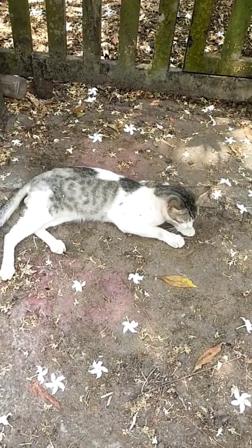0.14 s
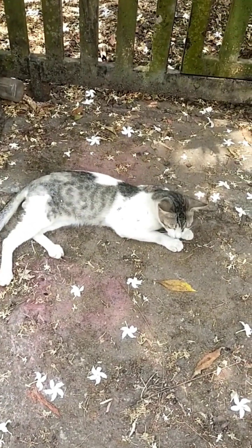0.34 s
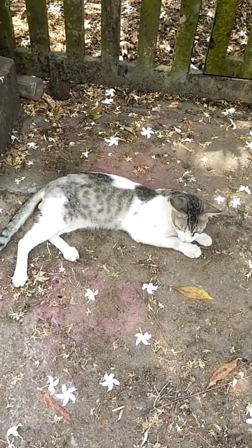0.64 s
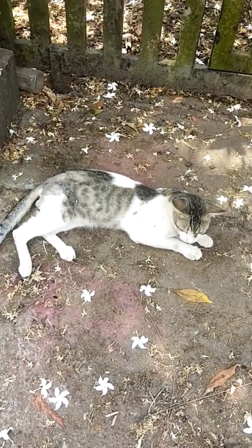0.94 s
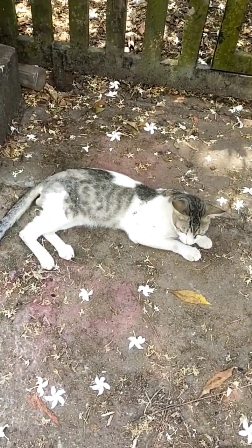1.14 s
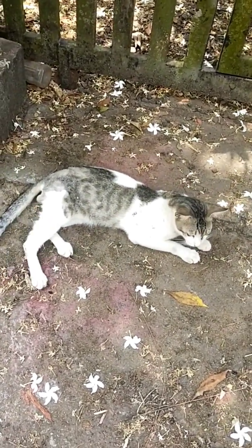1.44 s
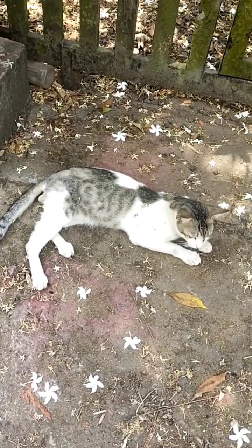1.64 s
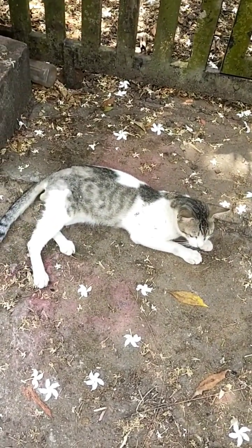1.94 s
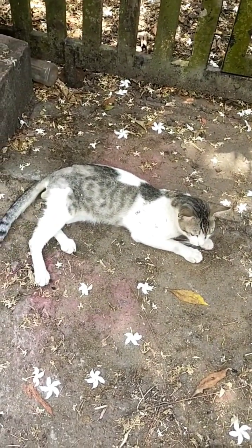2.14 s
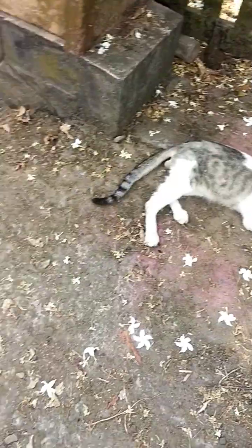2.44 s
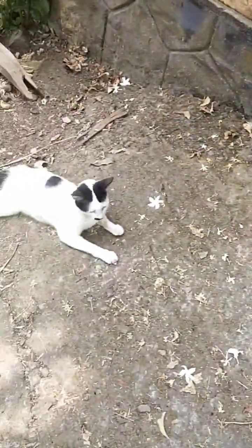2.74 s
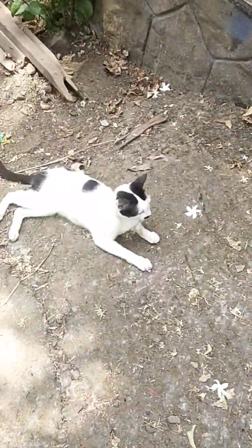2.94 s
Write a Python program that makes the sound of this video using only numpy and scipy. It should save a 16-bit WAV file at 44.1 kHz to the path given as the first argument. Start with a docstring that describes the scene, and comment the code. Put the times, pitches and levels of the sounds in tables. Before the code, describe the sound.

Hen clucking outdoors: the tail of an earlier squawk fades, one cluck, a gap with litter ticks and a faint far bird, then regular clucks and a loud squawk ringing off walls, heard in mono.

```python
"""The fading echo of an earlier squawk, insect hiss and a low rumble; then a hen, some metres off in a yard.
She clucks once, pauses, clucks in a run from a faint airy start and ends on a loud squawk; walls answer.
Dry litter ticks nearby and a far bird calls faintly. The hen is pulses and breath through throat resonances;
the walls are decaying noise convolved with her voice; the far bird, hiss and rumble are shaped noise."""
import sys
import numpy as np
from scipy import signal
from scipy.fft import rfft, irfft
from scipy.io import wavfile

SR = 44100
rng = np.random.default_rng(int(sys.argv[2]) if len(sys.argv) > 2 else 0)


def voltage_ratio(decibels):
    """Convert decibels (scalar or array-like) to amplitude ratios, 20 dB per decade."""
    exponent = np.asarray(decibels, float) / 20
    return 10 ** exponent


def file_out(sig):
    """Save sig as 16-bit WAV at sys.argv[1]."""
    # one column per channel
    cols = np.atleast_2d(sig).T
    # limit, then scale
    lim = np.clip(cols, -1, 1)
    pcm = np.round(lim * 32767).astype(np.int16)
    wavfile.write(sys.argv[1], SR, pcm)


N = 136710
T = np.arange(N) / SR

# Echo of the earlier squawk, as resonances: [f/Hz, width/Hz, level/dB]
EARLIER_COLOUR = [(507, 68, 1.5), (705, 110, 9), (1190, 900, -4.5), (2180, 890, -8), (3640, 610, -12.5),
                  (7230, 250, -7)]
EARLIER_START_DB, EARLIER_T60_S = -50, 0.39

# Spectrum of the leaf and insect hiss: [f/Hz, relative level/dB per Hz]
HISS_SPECTRUM = [(150, -42), (250, -6.5), (400, -9), (740, -12), (1400, -18), (2200, -21), (3450, -15.5),
                 (4700, -24.5), (6160, -19), (6800, -18.5), (7330, -11.5), (8000, -22), (9000, -63.5)]
# Swell of the hiss above its base level: [t/s, level/dB]
HISS_SWELL = [(0, 7.5), (.5, 1), (1.2, 0.5), (1.6, 8.5), (3.1, 0)]
HISS_BASE_DB, HISS_FLICKER_DB = -74.5, 5

# Wandering band of the far rumble: [t/s, level/dB, centre f/Hz]
RUMBLE_PATH = [(0.0, -79, 170.8), (0.16, -70, 207), (0.45, -78, 128.1), (0.67, -97, 172.1),
               (0.8, -72.5, 129), (1.6, -83, 200.7), (1.74, -63, 169), (2.3, -81, 165), (2.35, -65, 148.5),
               (2.5, -74, 182.7), (2.58, -74.5, 116.9), (2.67, -63.5, 125.7), (2.87, -75, 120.7),
               (3.1, -59, 153.3)]
# Low bed under it, slowly rising and easing a little at the end: [t/s, level/dB]
RUMBLE_BED = [(0, -82.5), (1.8, -76.5), (2.3, -73), (3.1, -74.5)]
RUMBLE_WANDER_HZ = 77   # rate of the noise that spreads the wandering band
HUM_HZ, HUM_PEAK_DB, HUM_WAVER_DB = 206.5, -81.5, 5.1

# Clucks: [start t/s, level below the beak split/dB, mid pitch f/Hz, breath/dB, beak opening as treble/dB]
CLUCKS = [(0.112, -30.5, 530, -5.5, 2.5), (1.108, -45, 499.3, 10, -9.5), (1.322, -33, 385.5, -0.5, -8),
          (1.522, -31.5, 392.7, 0, -3.5), (1.715, -32, 397, 3, -2.5), (1.914, -31, 394.8, 3, -1.5),
          (2.112, -32.5, 397.3, 5.5, 1), (2.315, -34, 390, 7.5, 3)]
# Throat during a cluck: [f/Hz, width/Hz, level/dB]
CLUCK_THROAT = [(284.3, 41, -19), (390, 180, -24), (530, 336, -22), (786.2, 105, 1.5), (1015.4, 155, -10.5),
                (1250, 261, -18.5), (2113, 300, -14.5), (2536, 238, -18), (2963, 200, -31),
                (3340, 400, -28.5), (3925, 670, -36.5), (7300, 1200, -42)]
# Each cluck catches once: [t after start/s, width/s, depth/share]
CLUCK_CATCH = (0.017, 0.0081, 0.32)
CLUCK_ATTACK_S, CLUCK_LENGTH_S, CLUCK_RELEASE_S = 0.016, 0.041, 0.007   # release to 1/e, after the length
CLUCK_PITCH_RISE, CLUCK_JITTER = 0.07, 0.0248   # shares of pitch: climb through a cluck, wobble
CLUCK_HALF_DB, CLUCK_FADE_HZ = -2, 3000   # half-pitch lines; above the fade the voice turns to rasp
BEAK_SPLIT_HZ, BEAK_OPENS_S = 1700, 0.022   # treble above the split comes in as the beak opens

# What the walls return less of, her strongest band: [f/Hz, width/Hz, depth/share]
ECHO_DIP = (770, 200, .75)
YARD_GAIN_DB, YARD_GAP_S, YARD_BUILD_S = 2.5, 0.012, 0.0055
YARD_SPLIT_HZ, YARD_LOW_T60_S = 1980, 0.41
YARD_TREBLE_T60_S, YARD_TREBLE_DB = 0.38, 3.0
DIRECT_CUT_HZ = 3100   # she faces away: treble comes by the walls

# Ticks in the nearby litter: [t/s, level/dB, length/s]
TICKS = [(0.295, -49, 0.026), (0.4012, -45, 0.0017), (0.679, -73.5, 0.03), (.8808, -47.5, 0.0012)]
# Their resonances: [f/Hz, width/Hz, level/dB]
TICK_COLOUR = [(1716, 430, 3), (2330, 950, -4), (4570, 1200, -9), (7310, 990, -5.5)]

# Far bird, blurred by distance: [t/s, rise/s, fall T60/s, level/dB, f/Hz, width/Hz]
FAR_CALLS = [(.32, .1, 0.51, -65, 1790, 90), (.33, 0.087, 0.47, -63.5, 1800, 36),
             (0.298, 0.017, 0.62, -71.5, 1390, 66), (0.98, 0.071, 0.5, -81.5, 694, 45),
             (0.937, 0.14, .5, -68.5, 1100, 36), (1.086, .01, .1, -58.5, 1200, 32),
             (0.995, 0.045, 0.4, -69, 1060, 50), (1.01, .06, 0.35, -75.5, 1740, 15),
             (1.045, 0.11, 0.34, -70, 2400, 40)]
FAR_SAG_PER_S = 0.3   # share of the starting pitch lost

# First side of the squawking voice: [t/s, pitch f/Hz, level/dB, half-pitch lines/dB, breath/dB]
SQUAWK_FIRST = [(2.422, 760, -46, -10, 1), (2.44, 765, -34, -8, 3), (2.455, 768, -26, -10, -1),
                (2.459, 872, -28, -15, -9), (2.49, 866, -25, -11, -11), (2.52, 852, -24, -11, -11),
                (2.57, 840, -29, -18, -13), (2.605, 826, -28, -16, -11), (2.65, 822, -30, -16, -10),
                (2.69, 828, -35, -16, -6), (2.72, 815, -60, -16, -6)]
# Second side, joining lower: [t/s, pitch f/Hz, level/dB, half-pitch lines/dB, breath/dB]
SQUAWK_LOW = [(2.59, 790, -38, -4.5, -8), (2.625, 759, -23.5, -9, -12.5), (2.67, 743.2, -30, -8.5, -20),
              (2.725, 734.2, -22, -9, -11.5), (2.75, 720.4, -32, -16.5, 1.5), (2.8, 703.6, -37.5, -7.5, -2),
              (2.825, 698, -66.5, -4.5, -7.5)]
# Throat during the squawk: [f/Hz, width/Hz, level/dB]
SQUAWK_THROAT = [(436, 260, -21.5), (745, 189, 2), (1311, 370, -7), (1892, 378, -8), (2536, 540, -14.5),
                 (3560, 720, -22.5), (3910, 885, -26), (5840, 180, -30.5), (6470, 720, -35),
                 (7216, 395, -18), (7760, 600, -27.5), (8300, 500, -26)]
FIRST_JITTER, LOW_JITTER = 0.004, 0.007   # pitch wobble, share
SQUAWK_SHIMMER_DB, SQUAWK_FADE_HZ, SQUAWK_EDGE_S = 3.5, 4600, 0.0054

MIC_HIGH_CUT_HZ, MIC_LOW_CUT_HZ = 8743, 49


def rms_one(x):
    """Scale to rms 1."""
    return x / np.sqrt(np.mean(x ** 2) + 1e-20)


def drift(rate):
    """Random wander of rms 1: noise through a two-pole low-pass at rate Hz."""
    r = np.exp(-2 * np.pi * rate / SR)
    settle = 9000   # samples dropped while the filter settles
    noise = rng.standard_normal(N + settle)
    return rms_one(signal.lfilter([1], [1, -2 * r, r * r], noise)[settle:])


def resonance(x, hz, width):
    """Two-pole band-pass with a gain of about 1 at its peak."""
    r = np.exp(-np.pi * width / SR)
    poles = [1, -2 * r * np.cos(2 * np.pi * hz / SR), r * r]
    return signal.lfilter([(1 - r * r) / 2, 0, (r * r - 1) / 2], poles, x)


def throat(x, shape):
    """Parallel resonances of alternating sign, each applied twice so that the valleys stay dark."""
    out = 0
    for k, (hz, width, db) in enumerate(shape):
        twice = resonance(resonance(x, hz, width), hz, width)
        out = out + (-1) ** k * voltage_ratio(db) * twice
    return out


def earlier_echo():
    """The yard still rings with the call before: coloured noise in exponential decay."""
    ring = rms_one(throat(rng.standard_normal(N), EARLIER_COLOUR))
    return voltage_ratio(EARLIER_START_DB - 60 * T / EARLIER_T60_S) * ring


def background():
    """Leaf and insect hiss: noise in quarter-octave bands, each flickering on its own."""
    hz, db = np.transpose(HISS_SPECTRUM)
    f = np.maximum(np.fft.rfftfreq(N, 1 / SR), 1)
    spectrum = rfft(rng.standard_normal(N)) * voltage_ratio(np.interp(np.log(f), np.log(hz), db))
    band = np.clip(np.round(4 * np.log2(f / 250)), 0, 20)
    hiss = 0
    for k in range(21):
        hiss = hiss + irfft(spectrum * (band == k), N) * voltage_ratio(HISS_FLICKER_DB * drift(5))
    swell_db = np.interp(T, *np.transpose(HISS_SWELL))
    return voltage_ratio(HISS_BASE_DB + swell_db) * rms_one(hiss)


def rumble():
    """A low band of noise whose centre wanders, over a deeper bed and a faint wavering hum."""
    s, db, hz = np.transpose(RUMBLE_PATH)
    phase = 2 * np.pi * np.cumsum(np.interp(T, s, hz)) / SR
    moving = drift(RUMBLE_WANDER_HZ) * np.cos(phase) + drift(RUMBLE_WANDER_HZ) * np.sin(phase)
    high_pass = signal.butter(2, 70, "high", fs=SR, output="sos")
    moving = signal.sosfilt(high_pass, rms_one(moving))
    bed_band = signal.butter(2, (65, 150), "band", fs=SR, output="sos")
    bed = rms_one(signal.sosfilt(bed_band, rng.standard_normal(N)))
    bed_db = np.interp(T, *np.transpose(RUMBLE_BED))
    hum = voltage_ratio(HUM_PEAK_DB + HUM_WAVER_DB * drift(4)) * np.sin(2 * np.pi * HUM_HZ * T)
    return voltage_ratio(np.interp(T, s, db)) * moving + voltage_ratio(bed_db) * bed + hum


def syrinx(pitch_hz, half_db, breath_db, jitter, fade_hz):
    """Strong-weak pulse pairs at a wobbling pitch, with air gated by each cycle."""
    half_phase = np.pi * np.cumsum(pitch_hz * (1 + jitter * drift(60.4))) / SR
    lines = 0
    for k in range(1, 40):   # odd k are the half-pitch lines
        level = voltage_ratio(half_db) if k % 2 else 1
        fade = 1 + (k * pitch_hz / 2 / fade_hz) ** 4
        lines = lines + level * np.cos(k * half_phase) / fade
    air = rng.standard_normal(N) * (1 + np.cos(2 * half_phase))
    return lines / np.sqrt(8000 / pitch_hz) + voltage_ratio(breath_db) * air


def clucks():
    """Short bursts of pulses and breath; a wider beak lets more treble out."""
    start, db, hz, breath_db, open_db = np.transpose(CLUCKS)
    k = np.clip(np.searchsorted(start, T) - 1, 0, None)   # latest cluck at each moment
    t = T - start[k]
    attack = np.sin(np.pi / 2 * np.clip(t / CLUCK_ATTACK_S, 0, 1)) ** 2
    catch_s, catch_width_s, catch_depth = CLUCK_CATCH
    catch = 1 - catch_depth * np.exp(-((t - catch_s) / catch_width_s) ** 2)
    release = np.exp(-np.clip(t - CLUCK_LENGTH_S, 0, 1) / CLUCK_RELEASE_S)
    climb = 1 + CLUCK_PITCH_RISE * (np.clip(t / CLUCK_LENGTH_S, 0, 1) - 0.5)
    source = syrinx(hz[k] * climb, CLUCK_HALF_DB, breath_db[k], CLUCK_JITTER, CLUCK_FADE_HZ)
    low = throat(source, [p for p in CLUCK_THROAT if p[0] < BEAK_SPLIT_HZ])
    high = throat(source, [p for p in CLUCK_THROAT if p[0] > BEAK_SPLIT_HZ])
    beak = voltage_ratio(open_db[k]) * np.clip(t / BEAK_OPENS_S, 0, 1) ** 2
    voice = (low + beak * high) / low.std()
    return attack * catch * release * voltage_ratio(db[k]) * voice


def yard(x):
    """Dense echoes off walls and fences: a gap, a build-up, then a decay, quicker in the treble."""
    t = T[:SR] - YARD_GAP_S
    noise = rng.standard_normal(SR)
    low = signal.lfilter(*signal.butter(1, YARD_SPLIT_HZ, fs=SR), noise)
    low_tail = low * voltage_ratio(-60 * t / YARD_LOW_T60_S)
    treble_tail = (noise - low) * voltage_ratio(YARD_TREBLE_DB - 60 * t / YARD_TREBLE_T60_S)
    echoes = np.clip(t / YARD_BUILD_S, 0, 1) * (low_tail + treble_tail)
    echoes = echoes / np.sqrt(np.sum(echoes ** 2))
    return voltage_ratio(YARD_GAIN_DB) * signal.fftconvolve(x, echoes)[:N]


def ticks():
    """Litter close by: two very short snaps and two longer scuffs, as bursts of resonant noise."""
    shape = 0
    for s, db, length in TICKS:
        shape = shape + voltage_ratio(db) * np.sin(np.pi * np.clip((T - s) / length, 0, 1))
    noise = rng.standard_normal(N)
    return throat(shape * noise + 1e-18, TICK_COLOUR) / throat(noise, TICK_COLOUR).std()


def far_bird():
    """Narrow hoarse notes, tones blurred by noise, that swell, sag in pitch and fade."""
    out = 0
    for s, rise, t60, db, hz, width in FAR_CALLS:
        t = np.clip(T - s, 0, 1)
        phase = 2 * np.pi * hz * (t - FAR_SAG_PER_S * t ** 2 / 2)
        note = drift(width) * np.cos(phase) + drift(width) * np.sin(phase)
        fall_db = -60 * np.clip(T - s - rise, 0, 9) / t60
        out = out + np.clip(t / rise, 0, 1) * voltage_ratio(db + fall_db) * note
    return out


def squawk(rows, jitter):
    """One side of a long strained call, pulses and breath through the throat, whose pitch sags."""
    s, *columns = np.transpose(rows)
    hz, db, half_db, breath_db = [np.interp(T, s, c) for c in columns]
    on = (T > s[0]) & (T < s[-1])
    voice = throat(syrinx(hz, half_db, breath_db, jitter, SQUAWK_FADE_HZ), SQUAWK_THROAT)
    edges = np.clip(np.minimum(T - s[0], s[-1] - T) / SQUAWK_EDGE_S, 0, 1)
    level = voltage_ratio(db + SQUAWK_SHIMMER_DB * drift(43))
    return edges * level * voice / voice[on].std()


def scene():
    """The hen with her echo, the litter with a little of it, the far bird and the background."""
    hen = clucks() + squawk(SQUAWK_FIRST, FIRST_JITTER) + squawk(SQUAWK_LOW, LOW_JITTER)
    litter = ticks()
    direct = signal.lfilter(*signal.butter(1, DIRECT_CUT_HZ, fs=SR), hen)
    dip_hz, dip_width_hz, dip_depth = ECHO_DIP
    thrown = hen - dip_depth * resonance(hen, dip_hz, dip_width_hz)
    echo = yard(thrown + voltage_ratio(-7.5) * litter)
    mix = direct + litter + echo + earlier_echo() + far_bird() + background() + rumble()
    return mix[None]   # one channel


def roll_off(x):
    """The treble ends steeply here."""
    return signal.sosfilt(signal.butter(12, 8380, fs=SR, output="sos"), x)


def record(dry):
    """A narrow-band mono microphone chain: steep high cut, gentle low cut."""
    high_cut = signal.cheby2(12, 60, MIC_HIGH_CUT_HZ, fs=SR, output="sos")
    low_cut = signal.butter(2, MIC_LOW_CUT_HZ, "high", fs=SR, output="sos")
    mix = signal.sosfilt(low_cut, signal.sosfilt(high_cut, dry))
    return roll_off(mix)


dry = scene()
out = record(dry)
file_out(out)
```